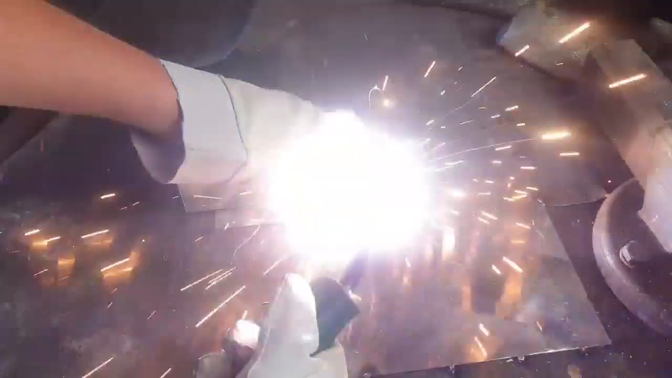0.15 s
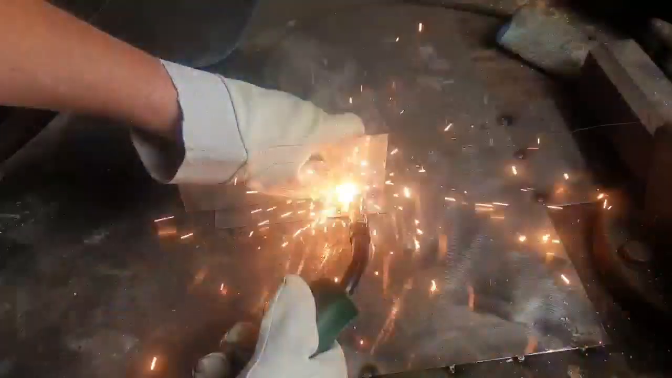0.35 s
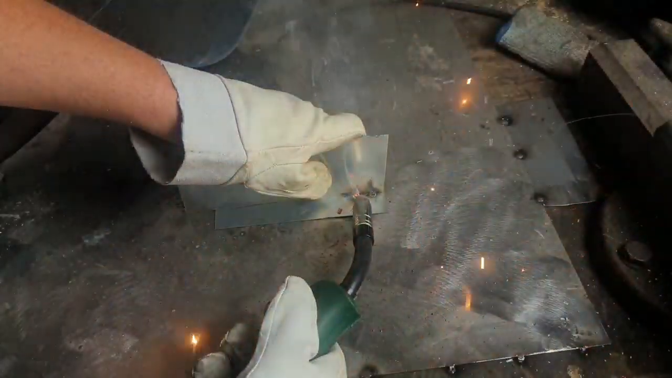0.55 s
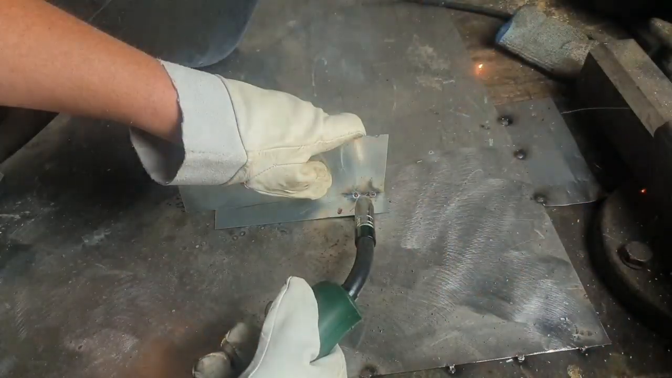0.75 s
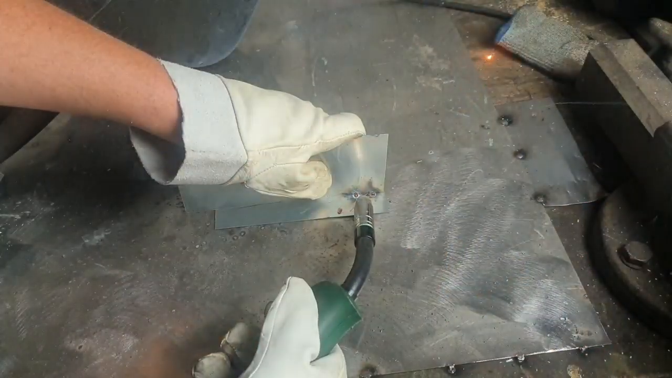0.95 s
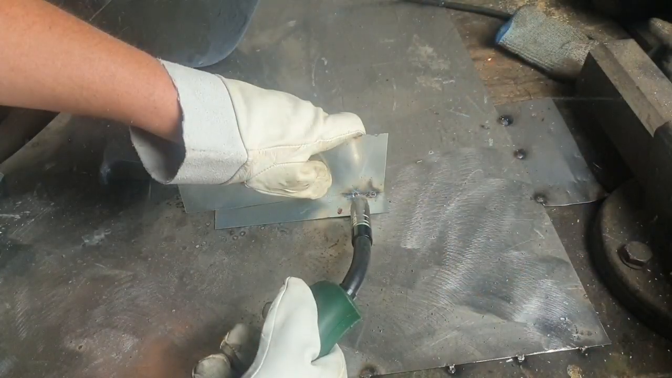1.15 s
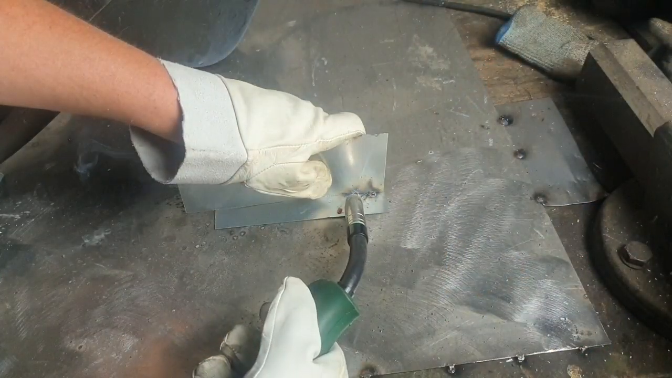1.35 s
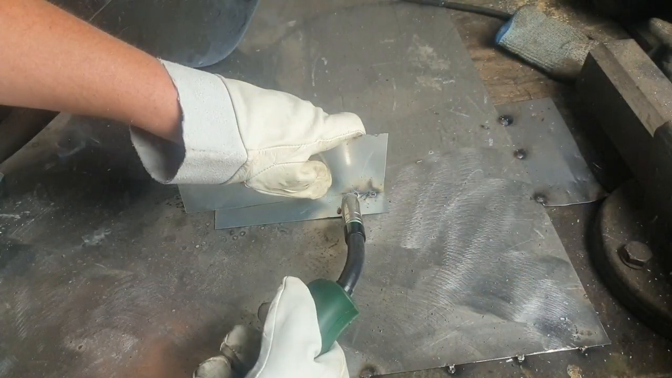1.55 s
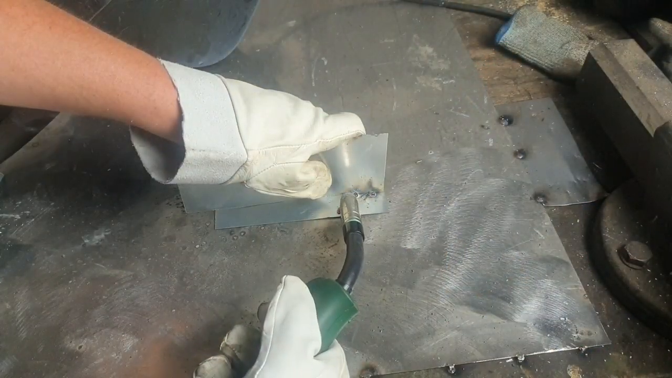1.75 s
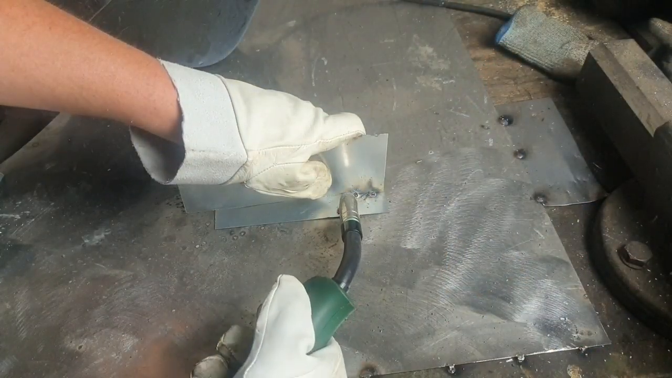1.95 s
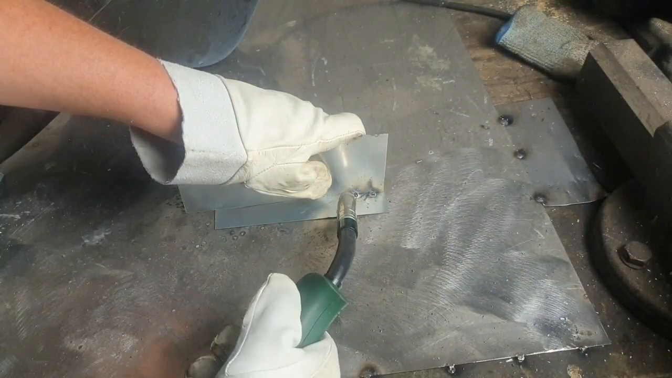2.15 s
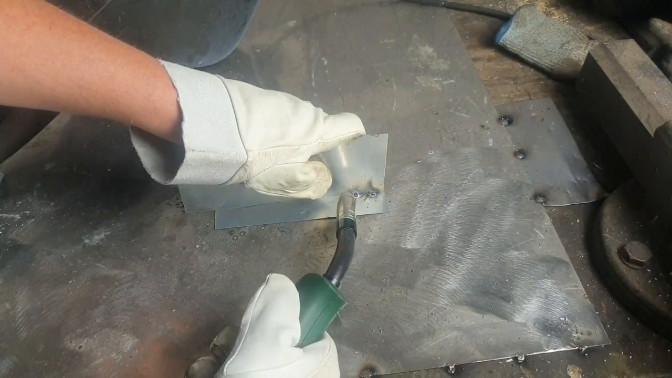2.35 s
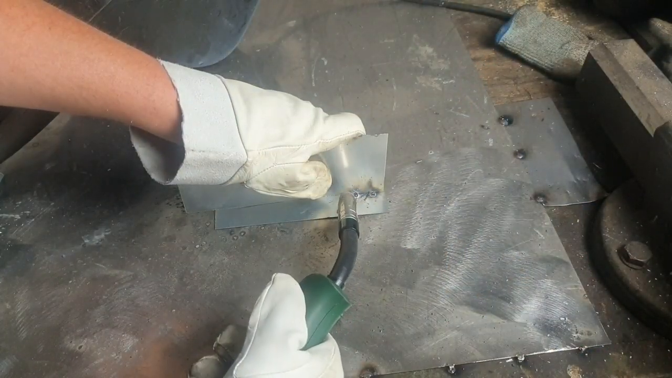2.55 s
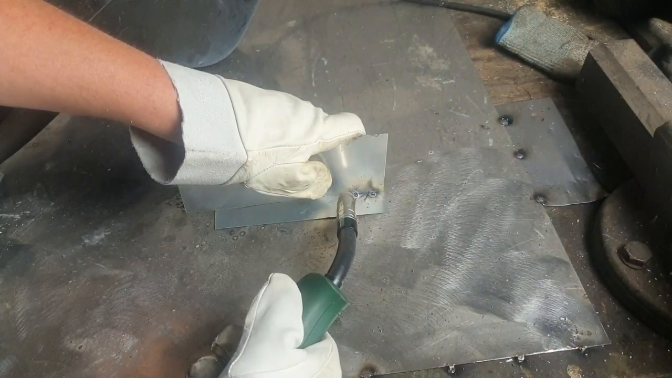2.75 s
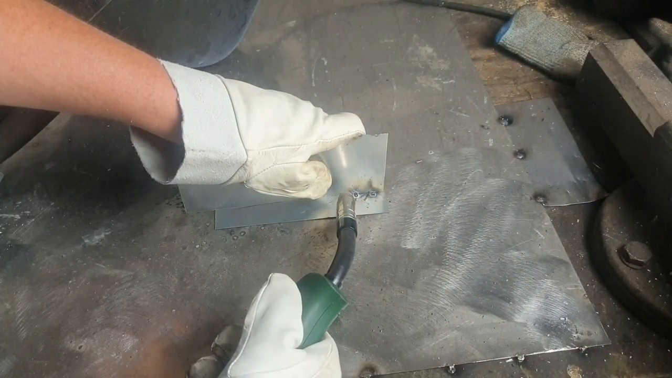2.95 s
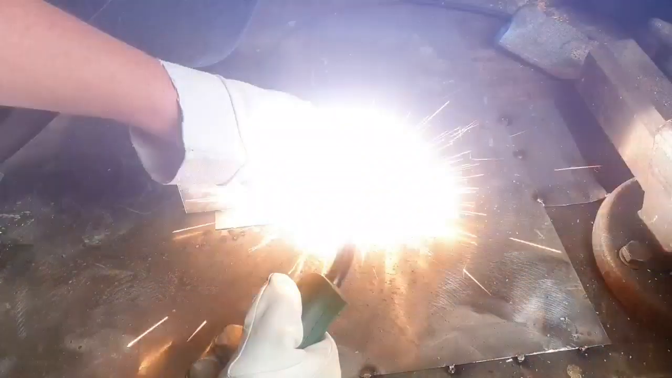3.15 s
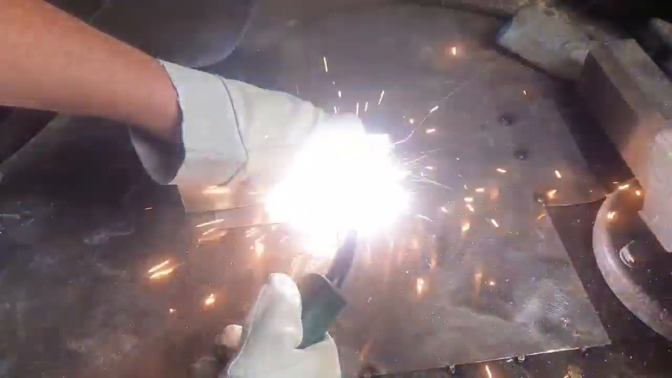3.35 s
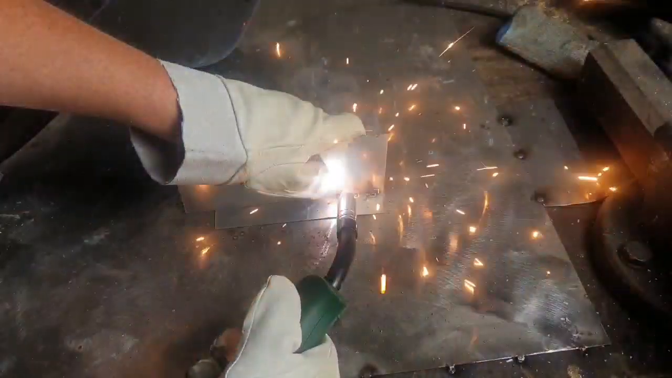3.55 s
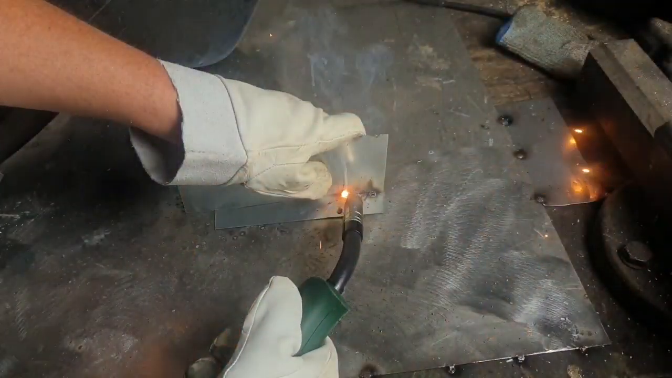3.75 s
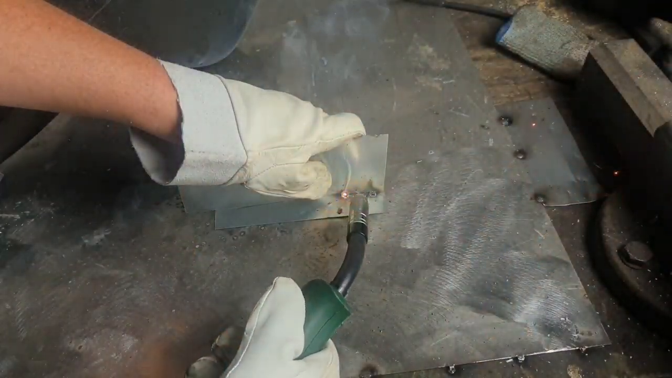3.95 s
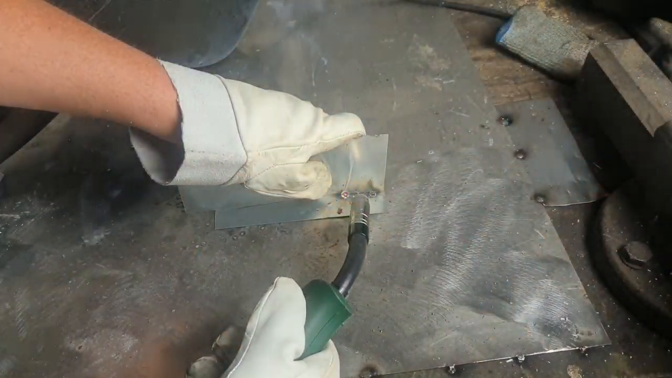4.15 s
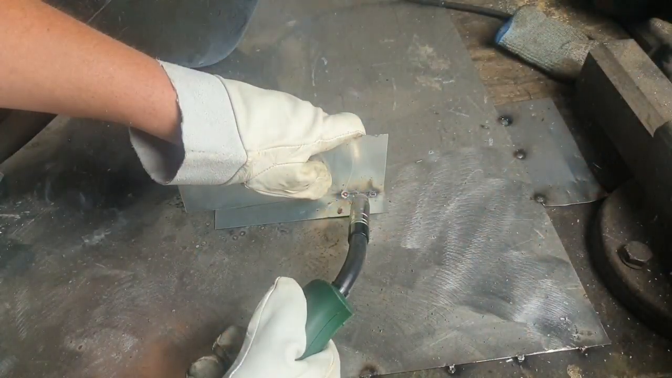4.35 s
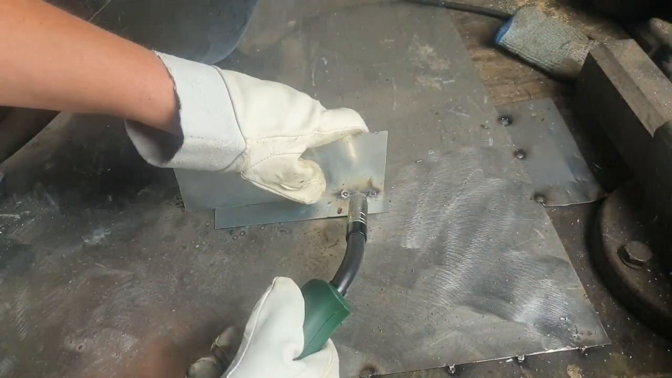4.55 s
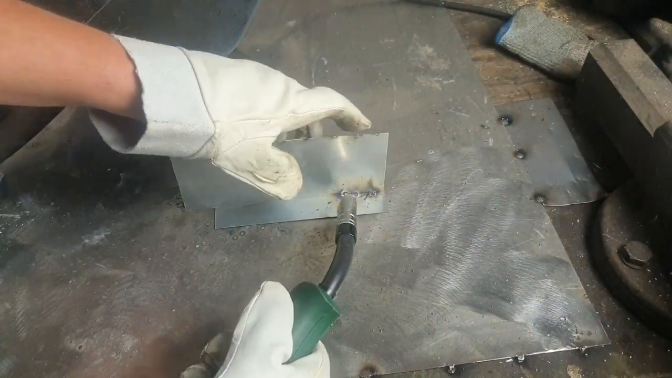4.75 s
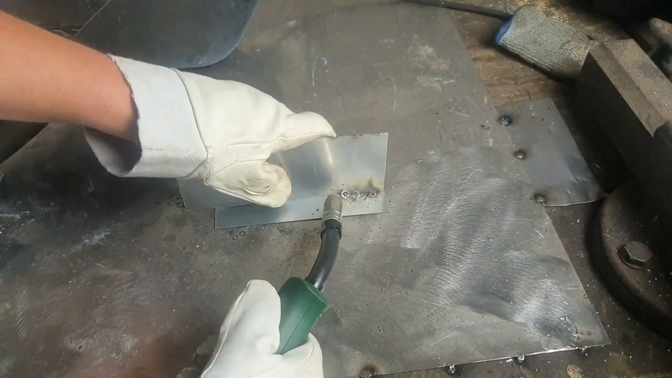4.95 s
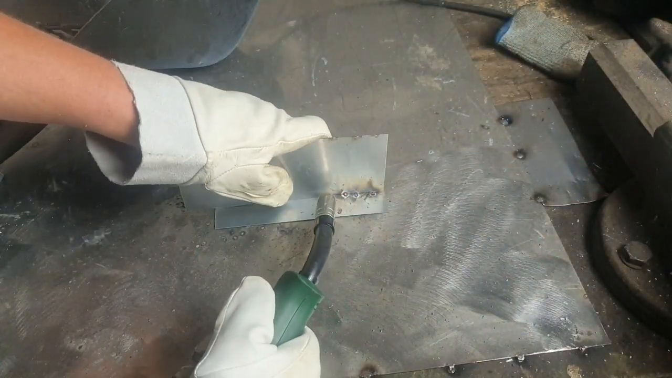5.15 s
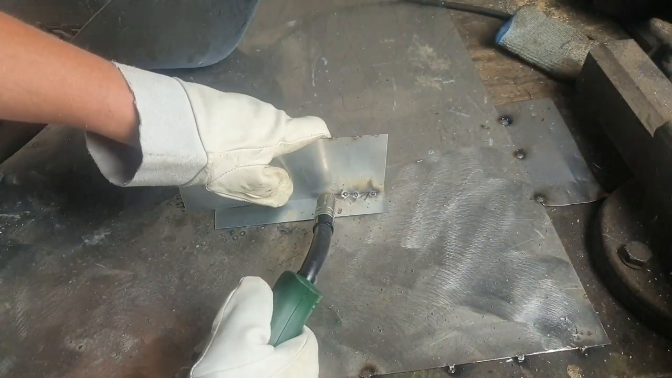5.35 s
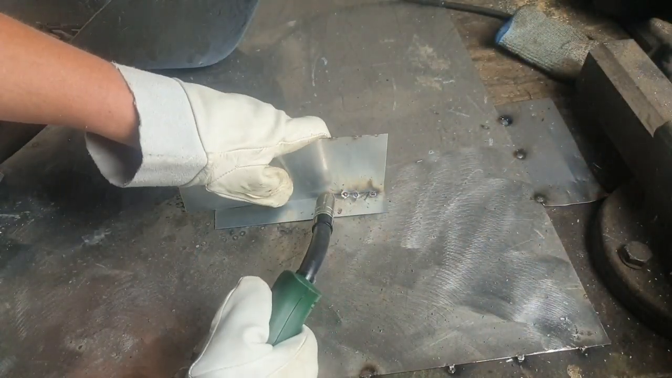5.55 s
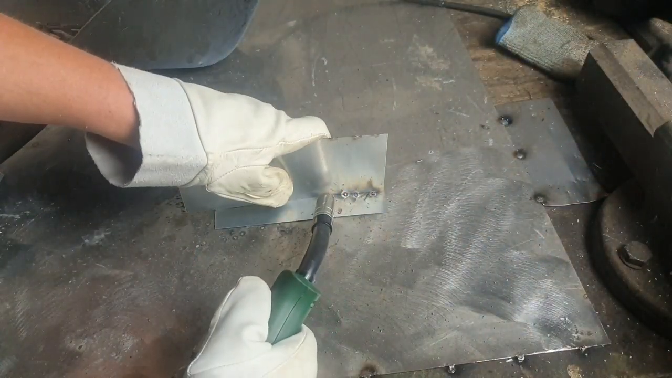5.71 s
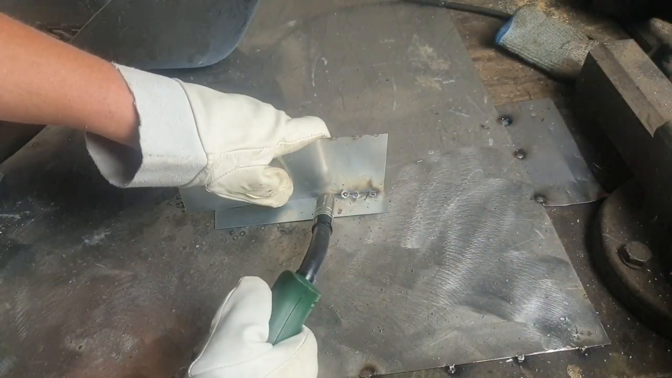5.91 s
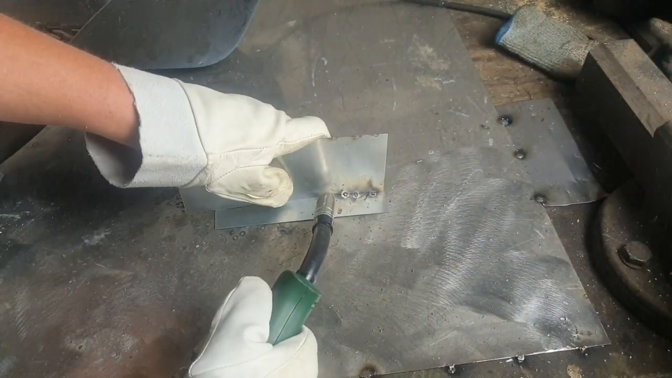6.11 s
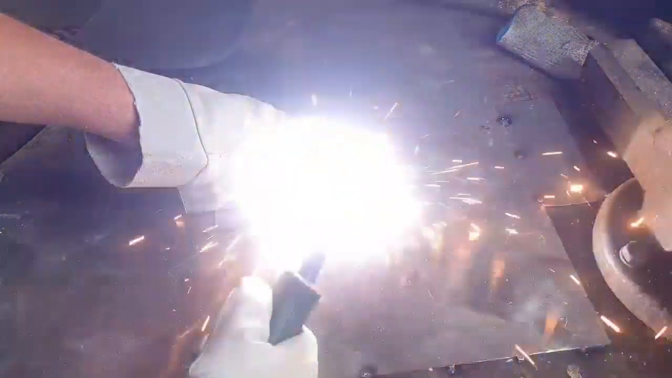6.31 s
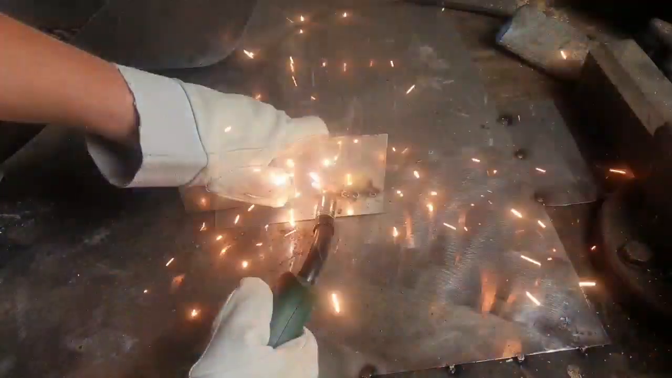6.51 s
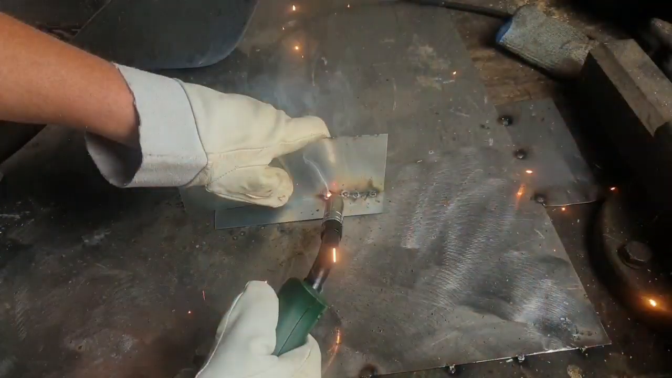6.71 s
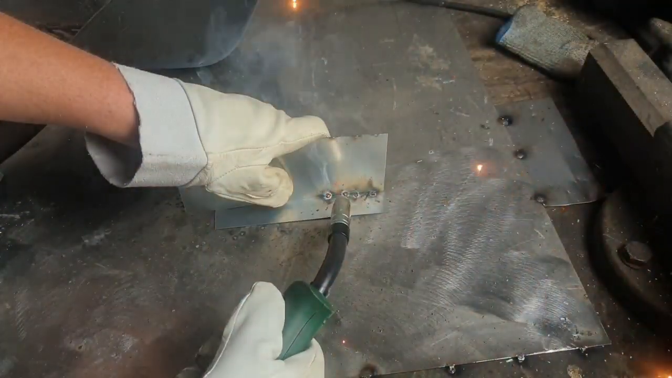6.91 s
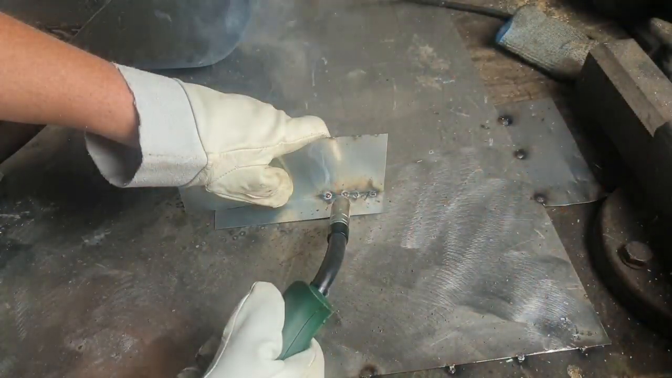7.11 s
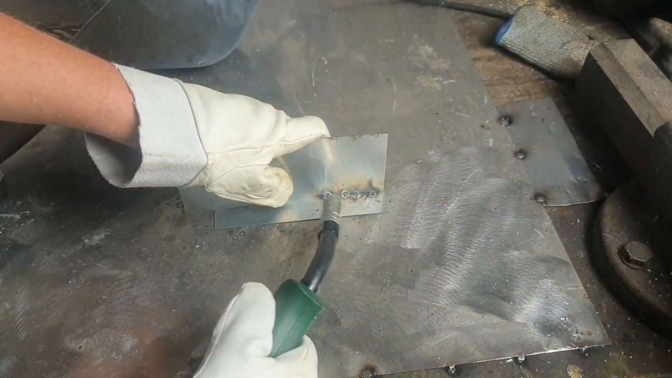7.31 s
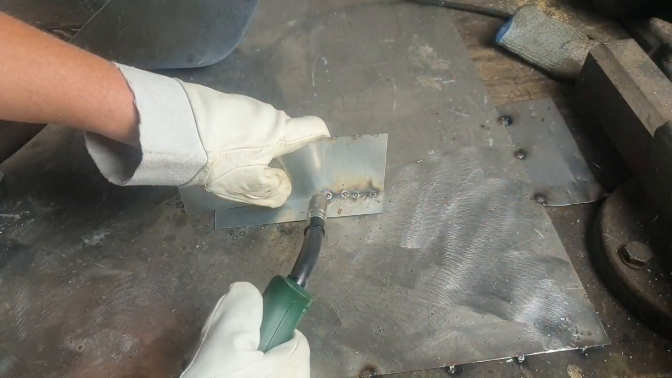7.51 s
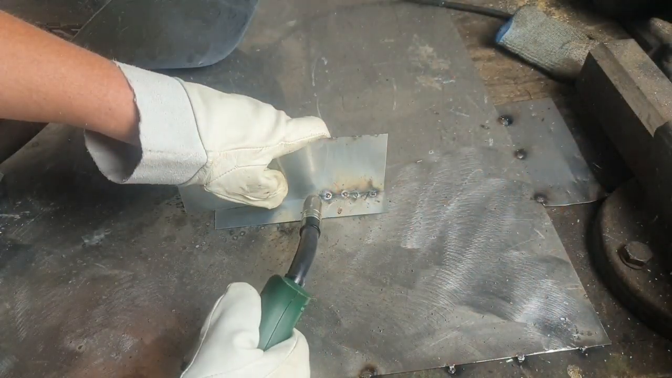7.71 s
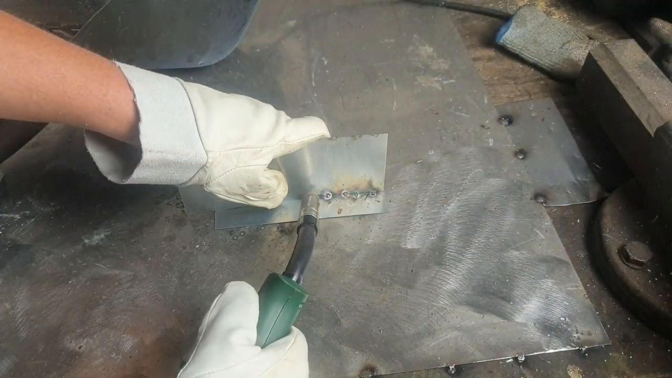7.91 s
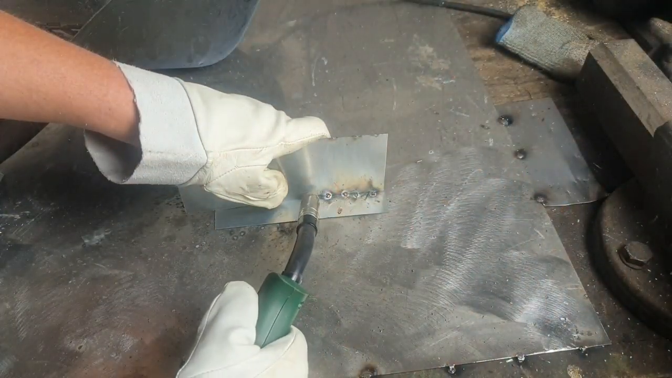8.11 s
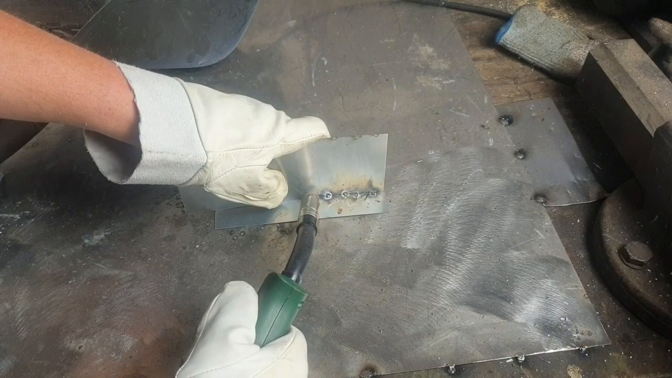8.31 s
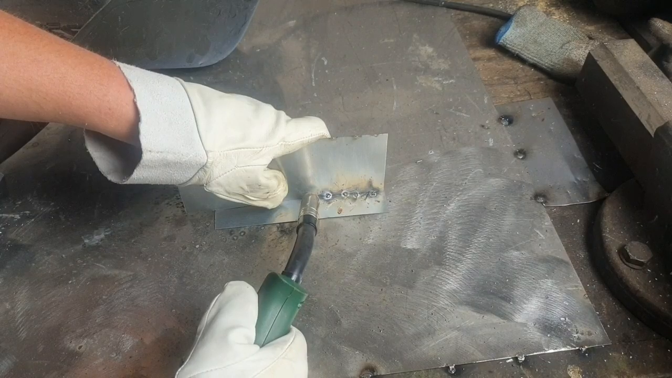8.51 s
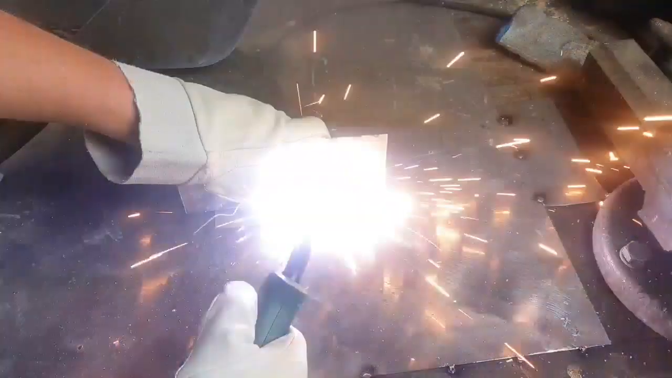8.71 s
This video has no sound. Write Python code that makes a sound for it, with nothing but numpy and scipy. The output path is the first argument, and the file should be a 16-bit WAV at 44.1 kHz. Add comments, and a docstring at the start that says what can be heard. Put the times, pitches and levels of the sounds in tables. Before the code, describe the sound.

A welder's cooling fan runs throughout, a steady hum strongest around 320 Hz with a soft airy rush, very slowly sagging in level. At about 0.06 s a loud arc strikes: irregular hard pops, snapping sputter and dense bright fizz on thin sheet steel, ending near 0.42 s with a brief tail from close workshop walls. Only fan and sparse tiny ticks follow, including small clicks around 2.0 and 2.7 s. A faint wire scratch at 3.25 s leads into a second crackling arc until 3.6 s. Quiet ticks come near 4.05 and 5.1-5.3 s. A third, duller-bodied arc sputters from 6.3 to 6.6 s. Ticks follow at 7.1 s, with a sharper dry click cluster near 7.7 s and a faint tap at 8.2 s. At 8.74 s a fourth arc cracks loudly and is cut short. The close mono microphone ducks after peaks, then the fan gradually recovers.

```python
"""Wire-feed welder on thin sheet

Four short arcs pop and crackle: blows ring resonances of sheet and bench, and near walls answer.
The welder's seven-blade cooling fan hums (sines at shaft multiples) and rushes (shaped noise).
Spatter, torch and sheet tick now and then: short dying noise bursts, each with a pitch of its own."""
import sys
import numpy as np
from scipy import signal
from scipy.fft import rfft, irfft, next_fast_len
from scipy.io import wavfile
from scipy.ndimage import minimum_filter1d, map_coordinates

SR = 44100
rng = np.random.default_rng(int(sys.argv[2]) if len(sys.argv) > 2 else 0)


def to_linear_factor(level_db):
    """Convert decibel levels (scalar or array-like) to linear amplitude factors."""
    exponent = np.asarray(level_db, float) / 20
    return 10 ** exponent


def waveform_to_disk(signal):
    """Save audio, clipped to [-1, 1], as 16-bit WAV at the path in sys.argv[1]."""
    frames = np.transpose(np.atleast_2d(signal))
    scaled = np.clip(frames, -1, 1) * 32767
    samples = np.round(scaled).astype(np.int16)
    wavfile.write(sys.argv[1], SR, samples)


N = 386756


def unit(x):
    """Scaled to rms 1."""
    return x / np.sqrt(np.mean(x ** 2) + 1e-20)


def unit_of(response):
    """RMS gain of a response on white noise."""
    return np.sqrt(np.mean(np.abs(response) ** 2))


def along(points, hz):
    """Interpolates (hz, value) points on a log frequency axis."""
    point_hz, value = np.transpose(points)
    return np.interp(np.log(hz + 1), np.log(point_hz + 1), value)


def wobble(knots_per_s):
    """Smooth random curve through random knots."""
    knots = rng.standard_normal(int(N * knots_per_s / SR) + 4)
    return map_coordinates(knots, [np.arange(N) * knots_per_s / SR])


def filtered(x, response):
    """x times a complex response of frequency."""
    size = next_fast_len(N + SR // 2)
    return irfft(rfft(x, size) * response(np.fft.rfftfreq(size, 1 / SR)), size)[:N]


def resonant(modes, sign=-1):
    """Causal response of summed second-order resonances; sign=-1 alternates their polarity."""
    return lambda f: sum(sign ** k * to_linear_factor(db) * 1j * f * width / (hz * hz - f * f + 1j * f * width)
                         for k, (hz, width, db) in enumerate(modes))


# multiples of the shaft speed given a tone, strong and very faint
FAN_ORDERS = [1, 3, 4, 5, 7, 8, 12, 14, 21, 24, 28, 32, 34, 35, 42, 49, 50, 56, 63, 70]
# one row per order, relative to FAN_DB: level_db, unsteadiness_db
FAN_TONES = [(-25.5, 2), (-18, 4), (-0.5, 0), (-22, 1.5), (-33, 0.5), (-20, 0.5), (-20.5, 4), (-21, 0.5),
             (-21.5, 0.5), (-48.5, 3), (-13, 0.7), (-35.5, 5), (-31, 4), (-24.5, 0.7), (-31.5, 5),
             (-22.5, 0.5), (-39.5, -2.5), (-24.5, 0.5), (-30, 2.5), (-33.5, -0.5)]
# relative spectral density of the rush: hz, density_db
FAN_AIR = [(20, -49), (40, -30), (69, -34), (173, -27), (300, -8.5), (445, -17), (684, -14.5), (1110, -19),
           (1530, -27), (2300, -26), (4100, -28.5), (7000, -39.5), (10000, -52.5), (13000, -73.5),
           (16000, -70.5)]
# case resonances added to the rush: hz, width_hz, level_db
FAN_HOUSING = [(258, 71, 2), (695.5, 31, 6.5), (800, 120, -7), (1030, 24, 1.5), (3520, 430, -3.5)]
SHAFT_HZ, SAG_HZ_PER_S = 79.91, 0.016  # starting speed, slow loss of speed
FAN_DB, FADE_DB_PER_S = -35, 0.14  # starting level, slow fade


def fan():
    """Shaft and blade tones waver over air noise coloured by the case resonances."""
    t = np.arange(N) / SR
    shaft_rad = 2 * np.pi * np.cumsum(SHAFT_HZ - SAG_HZ_PER_S * t) / SR
    tones = np.zeros(N)
    for order, (level_db, shake_db) in zip(FAN_ORDERS, FAN_TONES):
        gain = to_linear_factor(level_db + shake_db * wobble(25) + 1.14 * wobble(0.578))
        jitter_rad = 0.091 * shake_db * wobble(25)
        tones += gain * np.sin(order * shaft_rad + jitter_rad + rng.uniform(0, 2 * np.pi))
    air = filtered(rng.standard_normal(N),
                   lambda f: to_linear_factor(along(FAN_AIR, f)) * (1 + resonant(FAN_HOUSING, sign=1)(f)))
    rush = to_linear_factor(-5.5 + 0.52 * wobble(5.9)) * unit(air)
    return to_linear_factor(FAN_DB - FADE_DB_PER_S * t) * (np.sqrt(2) * tones + rush)


# bands cancelled by the bounce off the bench: hz, width_hz, share_lost (0-1)
BENCH_HOLLOWS = [(1835, 400, 0.41), (3120, 260, 0.5), (6800, 330, 0.3)]


def struck(blows, modes, soft_hz):
    """Blows ring modes whose powers add, softened above soft_hz; a blow of 1 peaks at 1."""
    f = np.fft.rfftfreq(4096, 1 / SR)
    power = sum(np.abs(resonant([mode])(f)) ** 2 for mode in modes)
    power = power / (1 + (f / soft_hz) ** 2) ** 2
    lost = sum(np.clip(share, 0, 0.95) * resonant([(hz, width, 0)])(f)
               for hz, width, share in BENCH_HOLLOWS)
    power = power * np.abs(1 - lost) ** 2
    # minimum phase: nothing rings before the blow
    cepstrum = irfft(np.log(power + 1e-10) / 2)
    fold = np.r_[1, np.full(2047, 2), 1, np.zeros(2047)]
    ring = irfft(np.exp(rfft(cepstrum * fold)))
    return signal.fftconvolve(blows, ring / np.abs(ring).max())[:N]


def spell(start_s, end_s, first_db, last_db):
    """Gain sliding between two levels, zero outside its span."""
    t = np.arange(N) / SR
    slide_db = np.interp(t, [start_s, max(end_s, start_s + 0.001)], [first_db, last_db])
    return ((t > start_s) & (t < end_s)) * to_linear_factor(slide_db)


# loudest short circuits: start_s, thump_blow_db, snap_blow_db
POP_BLOWS = [(.0635, -12, -23), (0.0661, 2.5, 1), (0.0708, -8, 0), (.1274, 1, 2.5), (0.1538, -0.5, -5),
             (0.1611, -7, -18), (0.188, -2.5, -2), (0.1961, -7, -10), (0.1997, 0, -14), (.2034, -1.5, -3),
             (0.2274, -7, -11.5), (0.2559, -6, -5.5), (.289, -13, -10), (.2995, -18, -11),
             (0.3036, -12, -7), (0.3145, -7.5, -6), (0.3422, 0, 0.5), (.363, -2.5, -4.5), (.393, -9, -5.5),
             (.412, -6, -5.5), (3.2688, 6, -10), (3.2731, -3.5, 0.5), (3.2879, -6, -10), (3.3147, -7, -18),
             (3.3258, -4.5, -5), (3.377, -14, -8), (3.394, -5, -6), (3.433, -9, -21), (3.4432, -10, -5),
             (3.4537, -8, -10), (3.4569, -11, -6.5), (3.4688, -11, -5), (3.5014, -8, -17),
             (3.5164, -10.5, -11), (3.5253, -9, -18), (3.5328, -6, -9), (3.541, -8, -9),
             (3.5519, -9.5, -5.5), (3.5666, -13, -7), (3.5922, -9.5, -16), (6.2945, 4, -3),
             (6.3054, -9, -12), (6.363, -6.5, -2), (6.368, -10, -15), (6.392, -18, -16), (6.4313, -8, -8),
             (6.44, -8.5, -12), (6.4775, -8.5, -8), (6.4922, -6.5, -9), (6.5016, -8, -16),
             (6.5167, -8, -16), (6.5281, -5, -4), (6.5341, -10, -7), (6.5403, -2, -12), (6.5706, -7, -4.5),
             (6.5842, -7, -17), (6.5868, -10.5, -10), (8.7357, 6, -4.5)]
# crackle while the arc burns, before its colour gains: start_s, end_s, first_db, last_db
BURN_SPELLS = [(0.065, 0.12, -21, -44), (0.125, 0.162, -23.5, -28), (0.184, 0.207, -24, -15.5),
               (0.225, 0.288, -25, -29.5), (0.286, 0.347, -26.5, -28.5), (0.348, 0.364, -35, -37),
               (0.389, 0.421, -24.5, -27.5), (3.271, 3.302, -21, -26.5), (3.314, 3.368, -26.5, -30),
               (3.371, 3.425, -24, -25), (3.427, 3.521, -25, -24.5), (3.525, 3.571, -31, -33),
               (3.59, 3.607, -23.5, -25.5), (6.294, 6.31, -13.5, -23), (6.31, 6.345, -31, -35),
               (6.355, 6.41, -23.5, -31), (6.41, 6.546, -22.5, -27), (6.569, 6.589, -28.5, -28.5),
               (8.737, 8.767, -19, -34.5)]
# colour of each arc's crackle: strike_s, treble_db, sheen_db (mostly above 8 kHz)
ARC_COLOURS = [(.063, -10.5, -11.5), (3.268, -8.5, -12), (6.295, -24, -3), (8.735, -11, -18)]
# wire scratching the sheet before it strikes: start_s, end_s, level_db, centre_hz
WIRE_TOUCH = (3.248, 3.265, -34, 2900)
# sheet and bench resonances: hz, width_hz, level_db
THUMP_MODES = [(90, 98, -27), (467, 380, -8), (925, 370, 0.5), (1276, 170, -1.5), (2344, 425, -3)]
# upper resonances of the thin sheet: hz, width_hz, level_db
SNAP_MODES = [(2640, 290, -3), (3570, 400, -2), (3910, 420, 0.5), (4800, 260, -7), (5600, 420, -6.5),
              (7330, 840, -9), (8400, 250, -7.5), (9070, 170, -9), (9900, 500, -15.5), (11330, 430, -12.5),
              (12200, 530, -10), (13900, 570, -19.5), (14800, 610, -20)]
# smaller short circuits at random, sized by the crackle
SPUTTER_PER_S, SPUTTER_DB, SPUTTER_SPREAD_DB, SPUTTER_SNAP_DB = 110, 7, 4.5, -0.5
SETTLE_S, DULL_DB = 0.039, -6  # less sheen just after the strike


def arc():
    """Big bursts, random sputter and dense crackle strike the sheet; pressure drops first."""
    t = np.arange(N) / SR
    burn = sum(spell(*row) for row in BURN_SPELLS)
    colours = np.transpose(ARC_COLOURS)
    current = np.maximum(np.searchsorted(colours[0], t) - 1, 0)
    strike_s, treble_db, sheen_db = colours[:, current]
    sheen_db = sheen_db + DULL_DB * (t - strike_s < SETTLE_S)

    sputter = (rng.random(N) < SPUTTER_PER_S / SR) * burn * to_linear_factor(SPUTTER_DB)
    low = -sputter * to_linear_factor(SPUTTER_SPREAD_DB * rng.standard_normal(N))
    high = -sputter * to_linear_factor(SPUTTER_SNAP_DB + SPUTTER_SPREAD_DB * rng.standard_normal(N))

    # no two snaps tear alike: 16 samples, the first fixed
    ragged = rng.standard_normal((len(POP_BLOWS), 16)) * 0.15 * to_linear_factor(-1.2 * np.arange(16))
    ragged[:, 0] = -1
    for (start_s, thump_db, snap_db), tear in zip(POP_BLOWS, ragged):
        at = round(start_s * SR)
        low[at] -= to_linear_factor(thump_db)
        high[at:][:len(tear)] += to_linear_factor(snap_db) * tear

    spark_size = to_linear_factor(np.minimum(3.1 * rng.exponential(size=N), 9))
    sparks = (rng.random(N) < 1800 / SR) * spark_size * rng.choice([-1, 1], N)
    fizz = unit(unit(sparks) + 0.45 * rng.standard_normal(N)) * to_linear_factor(1.5 * wobble(150))

    # each burst sizzles on, 60 dB down in 23 ms
    afterglow = to_linear_factor(-60 * np.arange(SR // 20) / SR / 0.023)

    def glow(blows, db):
        return to_linear_factor(db) * signal.fftconvolve(np.minimum(blows, 0), -afterglow)[:N]

    high += fizz * (to_linear_factor(treble_db) * burn + glow(high, db=-27))
    high += np.gradient(fizz) * to_linear_factor(sheen_db) * burn
    low += fizz * (to_linear_factor(-11.0) * burn + glow(low, db=-38.5))

    start_s, end_s, level_db, centre_hz = WIRE_TOUCH
    scratch_modes = [(centre_hz, 700, 0), (7200, 900, -13)]
    scratch = unit(filtered(rng.standard_normal(N), resonant(scratch_modes)))
    scratch = spell(start_s, end_s, level_db, level_db) * scratch
    thump = struck(low, THUMP_MODES, soft_hz=2500)
    snap = struck(high, SNAP_MODES, soft_hz=12000)
    return thump + snap + scratch


# ticks of spatter, torch and cooling sheet: start_s, hiss_db, ring_hz, ring_db, burst_t60_s
TICK_BURSTS = [(0.539, -34, 7440, -35.5, 0.05), (1.069, -42, 1160, -46, 0.023),
               (1.9607, -30.5, 1400, -38, 0.056), (2.4294, -54, 9900, -52, 0.023),
               (2.6603, -23.5, 2600, -26.5, 0.019), (2.6907, -28, 6470, -44, 0.027),
               (2.787, -63, 456, -25, 0.044), (4.0544, -39, 3580, -42, .034), (5.112, -46, 3450, -33, .036),
               (5.178, -51, 4500, -44, .03), (5.2594, -42, 4800, -41, .03),
               (6.7056, -48.5, 9000, -44, 0.03), (7.1307, -29, 1995, -40, 0.076),
               (7.15, -45, 2000, -33, .04), (7.6904, -43.5, 5600, -41.5, .018),
               (7.6975, -41.5, 12000, -43.5, 0.0088), (7.7173, -18, 4400, -13.5, 0.0076),
               (7.7545, -31, 1300, -16, 0.01), (8.208, -53, 1550, -32, 0.047)]
KNOCK_DB = 2.5  # knock on the sheet relative to hiss_db


def ticks():
    """Dying noise bursts hiss, ring at a pitch of their own and knock the sheet."""
    out, knocks = np.zeros(N + SR), np.zeros(N)
    t = np.arange(SR // 4) / SR
    f = np.fft.rfftfreq(len(t), 1 / SR)
    hiss = resonant([(3000, 6000, 0)])(f) / (1 + 1j * f / 6500) ** 3
    for start_s, hiss_db, ring_hz, ring_db, t60_s in TICK_BURSTS:
        at = round(start_s * SR)
        envelope = (1 - np.exp(-t / 0.00055)) * to_linear_factor(-60 * t / max(t60_s, 0.002))
        burst = rfft(envelope * rng.standard_normal(len(t)))
        knocks[at + 20] = to_linear_factor(hiss_db + KNOCK_DB)
        ring = resonant([(ring_hz, 0.3 * ring_hz, 0)])(f) / (1 + 1j * f / ring_hz / 2) ** 2
        colour = to_linear_factor(hiss_db) * hiss / unit_of(hiss) + to_linear_factor(ring_db) * ring / unit_of(ring)
        out[at:][:len(t)] += irfft(burst * colour, len(t)) / 2
    return out[:N] + struck(knocks, THUMP_MODES + SNAP_MODES, soft_hz=4000)


# near echoes: delay_s, level_db
BENCH_ECHOES = [(.0021, -28.5), (.0068, -17.5), (0.0098, -20)]
# decay of the tail: hz, t60_s
SHOP_DECAY = [(200, 0.23), (1000, 0.32), (4000, 0.33), (12000, .25)]


def shop(x):
    """Echoes off bench and near walls, then a noise tail decaying at its own rate per frequency."""
    hz, t, z = signal.stft(rng.standard_normal((3, SR // 2)), SR, nperseg=256)
    decay = to_linear_factor(-60 * t / along(SHOP_DECAY, hz)[:, None])
    tails = signal.istft(z * decay, SR, nperseg=256)[1]
    tails = tails / np.linalg.norm(tails, axis=1, keepdims=True)
    answers = to_linear_factor(-13) * np.pad(tails, ((0, 0), (130, 0)))
    for delay_s, level_db in BENCH_ECHOES:
        answers[:, round(delay_s * SR)] += to_linear_factor(level_db)
    # three tails take turns so that no ring builds up
    turns = np.arange(N) // 512 % 3 == np.arange(3)[:, None]
    return signal.fftconvolve(x * turns, answers, axes=1)[:, :N].sum(axis=0)


def scene():
    """Arc and ticks in the shop, over the fan."""
    near = arc() + ticks()
    return (near + shop(near) + fan())[None]


CEILING_DB, DEEPEST_DB = -5, -4.5  # peak level that triggers, largest gain change
HOLD_S, RECOVER_DB_PER_S, AHEAD_S = 2.14, 6.5, 0.001


def gain_control(x):
    """Ducks at once for peaks over the ceiling, holds, then recovers at a steady dB rate."""
    need_db = np.clip(CEILING_DB - 20 * np.log10(np.abs(x) + 1e-9), DEEPEST_DB, 0)
    hold, ahead = round(HOLD_S * SR), round(AHEAD_S * SR)
    held_db = minimum_filter1d(np.pad(need_db, (hold, ahead)), size=hold + ahead)
    held_db = held_db[(hold + ahead) // 2 + 1:][:N]
    climb_db = RECOVER_DB_PER_S * np.arange(N) / SR
    gain_db = climb_db + np.minimum.accumulate(held_db - climb_db)
    return x * to_linear_factor(np.minimum(gain_db, 0))


def roll_off(x):
    """The treble ends steeply here."""
    return signal.sosfilt(signal.butter(12, 16640, fs=SR, output="sos"), x)


def record(dry):
    """Gain control, faint microphone hiss, rounding near full scale, then a steep band limit."""
    heard = gain_control(dry[0]) + to_linear_factor(-88) * rng.standard_normal(N)
    rounded = heard / (1 + np.abs(heard / 0.98) ** 6) ** (1 / 6)
    narrow = filtered(rounded, lambda f: 1 / (1 + (f / 15500) ** 90))[None]
    return roll_off(narrow)


dry = scene()
out = record(dry)
waveform_to_disk(out)
```